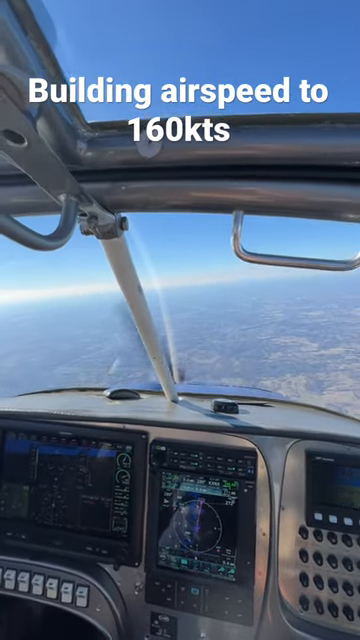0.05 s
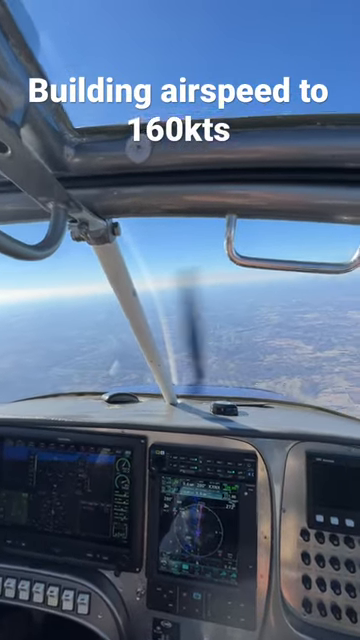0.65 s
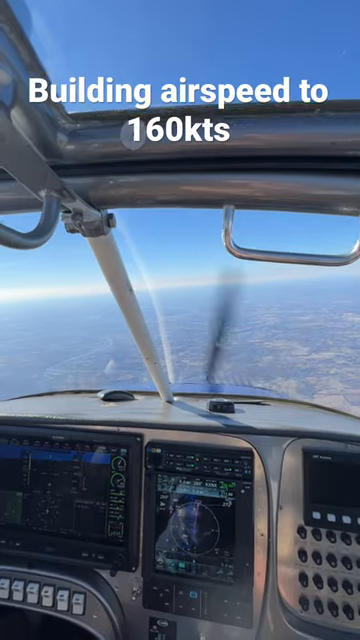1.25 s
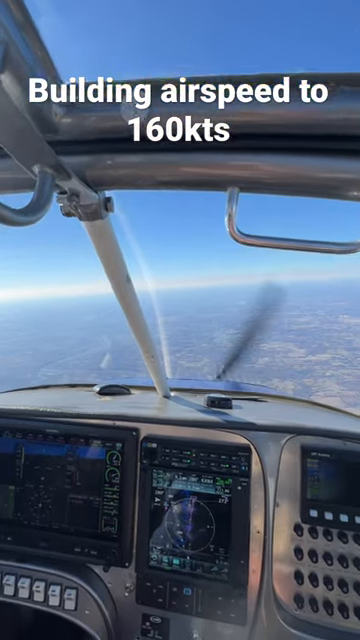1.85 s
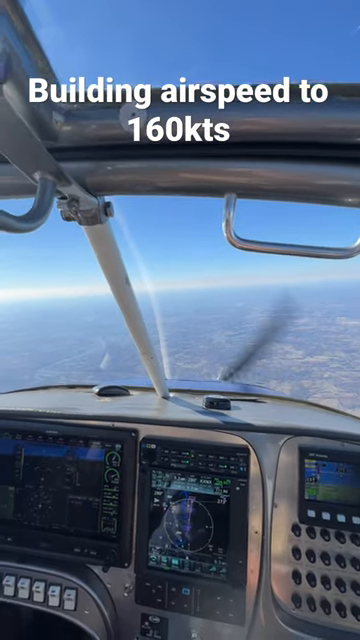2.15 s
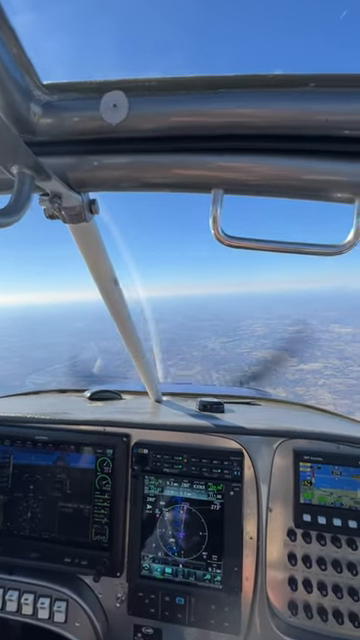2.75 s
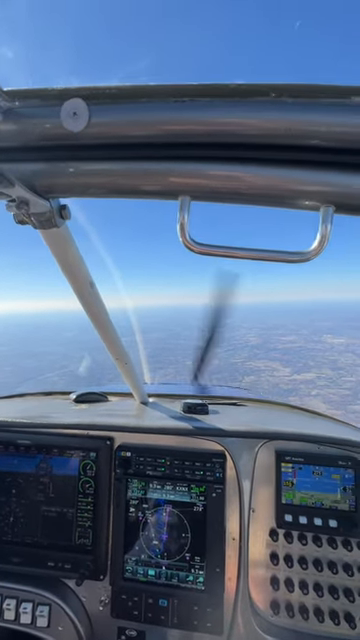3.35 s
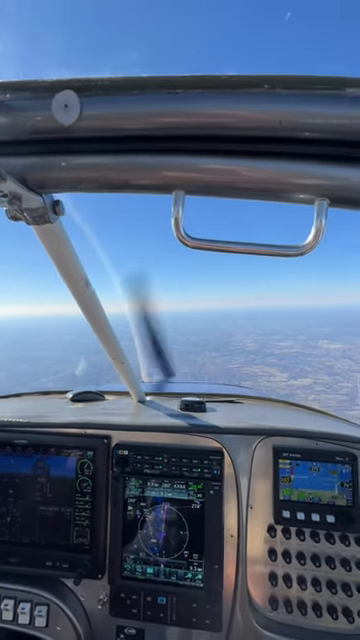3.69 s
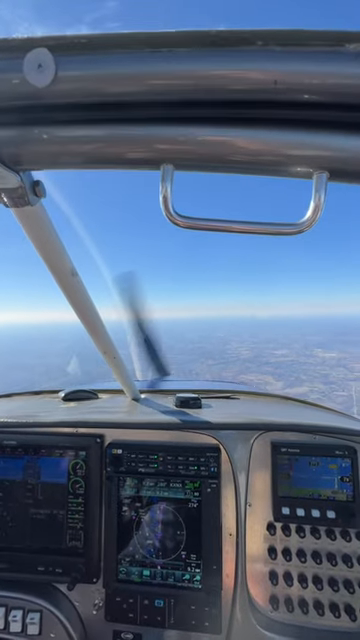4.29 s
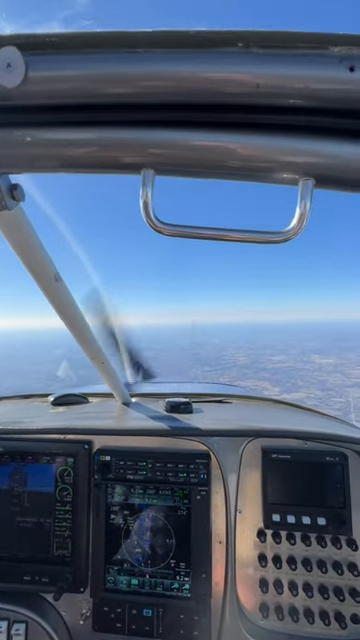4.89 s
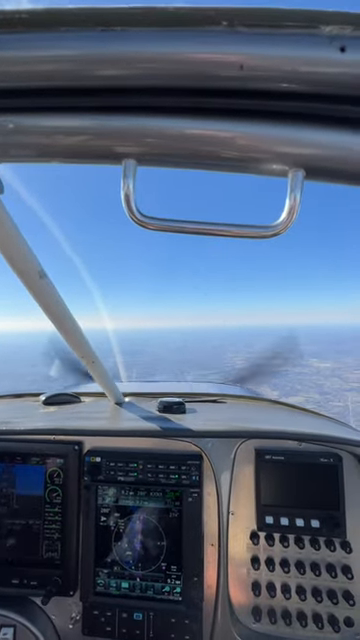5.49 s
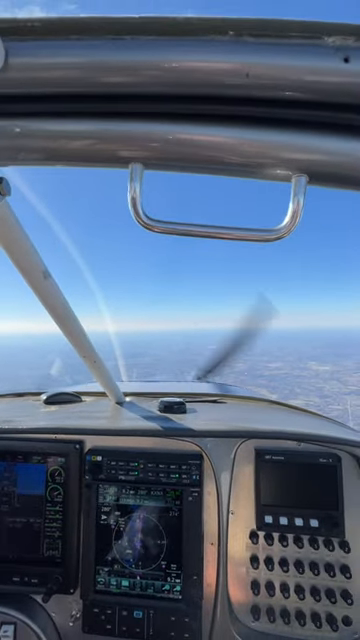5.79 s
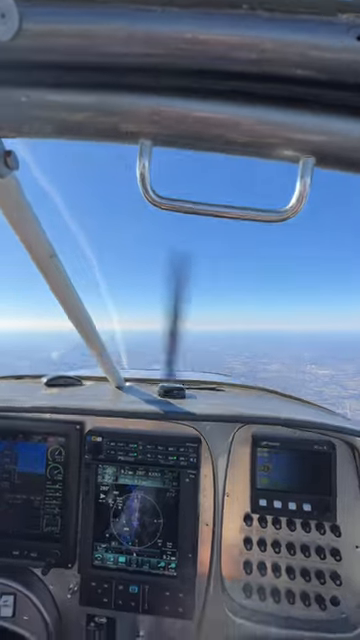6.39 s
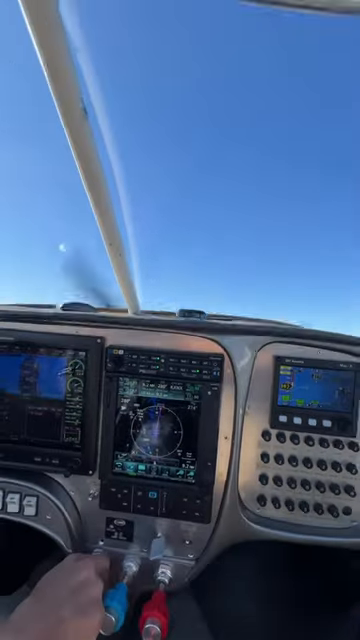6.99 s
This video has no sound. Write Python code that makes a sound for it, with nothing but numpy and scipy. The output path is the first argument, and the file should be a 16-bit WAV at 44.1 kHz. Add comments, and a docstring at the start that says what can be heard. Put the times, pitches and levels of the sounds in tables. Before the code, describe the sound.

Inside a light aircraft's cockpit, a piston engine and propeller hold a deep, throbbing drone over the roar of rushing air and a thin hiss from vents and seals. The drone is fullest and buzziest for the first two seconds or so, then softens as the hand-held microphone moves. Near the end the low boom sinks further, while the air noise carries on and the pitch barely changes.

```python
"""Inside the cockpit of a light aircraft in a shallow dive.
A four-cylinder engine and a two-blade propeller drone. Air rushing past roars through the cabin panels
and hisses at the seals and vents. Echoes in the cabin form standing waves: fixed loud and quiet spots.
We listen from a hand-held camera that moves through them, so the low notes swell and sink."""
import sys
import numpy as np
from scipy import signal
from scipy.fft import rfft, irfft, next_fast_len
from scipy.io import wavfile
from scipy.ndimage import map_coordinates

SR = 44100
rng = np.random.default_rng(int(sys.argv[2]) if len(sys.argv) > 2 else 0)


def wav_out(sig):
    """Save sig, one row per channel (or a flat mono array), as 16-bit PCM at SR to the path in sys.argv[1]."""
    wavfile.write(sys.argv[1], SR, np.round(np.clip(np.atleast_2d(sig).T, -1, 1) * 32767).astype(np.int16))


N = 310464


# The propeller's buzzing overtones. Columns: firing_multiple, level_db, gain_db_per_buzz_db
BLADE_TONES = [(4, -34.5, 1), (5, -37, 0.86), (6, -52.5, -0.5), (7, -56, 1.8), (8, -50.5, 2),
               (9, -52.5, -0.5)]
def drone(cycles, boom_db, second_db, third_db, buzz_db):
    """Four firings and four blade passes per engine cycle make a deep boom with overtones above it."""
    firings = 4 * cycles
    boom = amp(boom_db) * tone(firings, shake=0.024, shake_hz=9, lead_rad=-.06)
    second = amp(second_db) * tone(overtone(firings, 2), shake=0.011, shake_hz=12, lead_rad=-0.019)
    third = amp(third_db) * tone(overtone(firings, 3), shake=0.0077, shake_hz=11)
    buzz = 0
    for multiple, level_db, follows in BLADE_TONES:
        lead_rad = 1.02 * np.clip(multiple - 4, 0, 1.5)  # shorter waves differ more from left to right
        blade = tone(overtone(firings, round(multiple)), shake=0.098, shake_hz=9, lead_rad=lead_rad)
        buzz = buzz + amp(level_db + follows * buzz_db) * blade
    return boom * pan(-1) + second * pan(-3) + third * pan(-2.5) + buzz * pan(-0.5)


def overtone(firings, multiple, smear_turns=0.0875):
    """Turns of one overtone. The cabin's skin smears each pulse by shifting its overtones apart."""
    return multiple * firings + smear_turns * multiple * (multiple - 1)


# Tones from the unequal cylinders. Columns: cycle_multiple, level_db
CYLINDER_TONES = [(2, -44), (3, -34), (5, -27), (6, -35.5), (7, -42), (9, -35.5), (11, -42), (13, -47.5),
                  (14, -41), (15, -43), (18, -43), (19, -51), (22, -45.5), (27, -51.5), (33, -54),
                  (43, -49.5), (44, -52.5), (46, -50.5), (51, -55), (63, -52.5)]
# The next standing wave, loud where the boom is quiet.
# Columns: cycle_multiple, width_multiples, rise_db_per_sink_db
NEXT_WAVE = (6.8, .9, 2.6)
def cylinders(cycles, sink_db):
    """No two cylinders fire alike, so weaker tones fill the gaps and make the drone throb."""
    centre, width, rise = NEXT_WAVE
    tones = 0
    for multiple, level_db in CYLINDER_TONES:
        near_boom = np.exp(-((multiple - 5) / 5) ** 2)
        near_next_wave = np.exp(-((multiple - centre) / width) ** 2)
        change_db = (1.1 * near_boom - rise * near_next_wave) * sink_db
        turns = round(multiple) * cycles + rng.random()
        shake = min(0.042 + .014 * multiple, 1)
        tones = tones + amp(level_db + change_db) * tone(turns, shake, shake_hz=9)
    return tones * pan(-2)


def tone(turns, shake, shake_hz, lead_rad=0):
    """One stereo engine tone. Fuel burns unevenly, which shakes its strength and timing."""
    unevenness = 1 + shake * (wobble(shake_hz) + 1j * wobble(shake_hz))
    left = unit(unevenness) * np.exp(2j * np.pi * turns)
    right = left * np.exp(-1j * lead_rad)
    return np.sqrt(2) * np.array([left.real, right.real])


def standing_boom(distance_m, loud_db=-14.5, quiet_db=-32, wavelength_m=4.37):
    """The boom's level in dB at a distance from the quiet spot of its standing wave."""
    swing = amp(loud_db) * np.sin(2 * np.pi * distance_m / wavelength_m)
    return 20 * np.log10(np.hypot(swing, amp(quiet_db)))


# The camera's first distance from the quiet spot, and the mix there.
# Columns: distance_m, second_db, third_db, buzz_db, roar_db, vent_db, whistle_db
FIRST_SPOT = (0.68, -25.7, -20.8, 1.8, -23.5, -32, -41.5)
# Its moves. Columns: start_s, length_s, then the new spot's columns as above
CAMERA_MOVES = [(.3, 0.38, 0.76, -23.5, -20, 5, -24.5, -31.5, -42.5),
                (2.38, 0.22, 0.45, -25.2, -22.5, -7, -25.5, -32.5, -44.5),
                (2.85, .35, 0.35, -24.5, -22, -3, -24.5, -32, -42.5),
                (3.7, .5, 0.34, -25, -22.2, -2.5, -24.5, -31, -44),
                (6.36, 0.48, -.15, -29.5, -27, -4.5, -25.5, -35.5, -41.5)]
def camera(ahead_s=0):
    """The camera rests, glides to a new spot and rests again. Gives one curve per column of a spot."""
    spot = np.outer(FIRST_SPOT, np.ones(N))
    for start_s, length_s, *goal in CAMERA_MOVES:
        progress = np.clip((seconds() + ahead_s - start_s) / length_s, 0, 1)
        spot = spot + (np.array(goal)[:, None] - spot) * np.sin(np.pi / 2 * progress) ** 2
    return spot


# The roar's shape from bass to treble. Columns: pitch_hz, relative_db
ROAR_SHAPE = [(12, -32), (33, -22), (50, -17), (70, -1), (105, -1.5), (150, -12.5), (210, -8.5), (310, -11),
              (420, -12.5), (600, -17), (780, -21), (1150, -26), (1700, -27.5), (4000, -68)]
# Where the panels and cabin ring. Columns: pitch_hz, width_hz, boost_db
PANEL_RINGS = [(94, 5.2, 3.5), (121, 20, 5), (258.3, 21, 8.5), (510, 28, 1), (880, 66, 6.5), (1022, 90, 6),
               (1230, 76, 4)]
def cabin_roar(cycles, roar_db, sink_db):
    """Swirling air and exhaust shake the panels. The upper roar pulses with the engine."""
    roar = rush(ROAR_SHAPE, PANEL_RINGS)
    rumble = signal.sosfiltfilt(signal.butter(3, 105, fs=SR, output="sos"), roar)
    roar = roar + rumble * (amp(0.74 * sink_db) - 1)  # the rumble sinks with the boom
    low = signal.sosfiltfilt(signal.butter(2, 450, fs=SR, output="sos"), roar)
    throb = sum(np.cos(2 * np.pi * (multiple * cycles + rng.random())) for multiple in (2, 3, 4, 8))
    upper = (roar - low) * (1 + 0.053 * throb)
    return amp(roar_db + 0.17 * wobble(6.9)) * (low * pan(-3.5) + upper * pan(1.4))


# Air over the canopy and seals. Columns: pitch_hz, relative_db
SEAL_SHAPE = [(400, -35), (1300, -6), (1750, -6), (2400, 1.5), (2950, -0.5), (3900, -2.5), (4500, -2.5),
              (5200, -1.5), (6000, 0), (7000, -4), (8150, -6), (9000, -9), (10500, -15), (16000, -14.5)]
# The vents' hiss and its thin, sizzling top. Columns: pitch_hz, relative_db
VENT_SHAPE = [(6000, -28), (9000, -15.5), (10500, -6), (12000, -1), (13500, 3), (15000, 9), (16000, -7)]
SIZZLE_SHAPE = [(11000, -23.5), (13500, -19), (14700, -5), (15200, 6), (15750, 0), (17000, -21)]
# The sizzle dips once. Columns: middle_s, half_length_s, depth_db
BRIEF_DIP = (3.4, .33, 4)
def air_hiss(vent_db):
    """Air rushes steadily over the seals and hisses from the vents in narrow jets."""
    seals = amp(-31 + .3 * wobble(25)) * rush(SEAL_SHAPE) * pan(0.3)
    flutter_db = .3 * wobble(14)
    vent = amp(vent_db + flutter_db + 1.5) * rush(VENT_SHAPE)
    middle_s, half_length_s, depth_db = BRIEF_DIP
    dip_db = depth_db * np.exp(-((seconds() - middle_s) / half_length_s) ** 2)
    sizzle_db = -32.5 + 0.48 * (vent_db - np.mean(vent_db)) - dip_db
    sizzle = amp(sizzle_db + flutter_db + .6 * wobble(7.1)) * rush(SIZZLE_SHAPE)
    return seals + vent + sizzle


# A breathy hum across the cabin. Columns: pitch_hz, relative_db
HUM_SHAPE = [(200, -44), (335, -0.5), (385, -2.5), (620, -41)]
# The note it rings at. Columns: pitch_hz, width_hz, boost_db
HUM_RING = [(361, 13, 8.2)]
def cabin_hum(buzz_db):
    """The roar rings a standing wave across the cabin, strongest where the blades' buzz is weak."""
    return amp(-39 - 0.5 * buzz_db) * rush(HUM_SHAPE, HUM_RING) * pan(-7.5)


# The noise of a leak. Columns: pitch_hz, relative_db
LEAK_SHAPE = [(1500, -40), (2400, -0.5), (2900, -1.5), (4200, -40)]
# Its breathy whistles. Columns: pitch_hz, width_hz, boost_db
LEAK_WHISTLES = [(2530, 190, 18.5), (2840, 230, 21.5)]
def seal_whistle(whistle_db):
    """A leaking seal whistles faintly, louder when the camera is near it."""
    return amp(whistle_db + 1.4 * wobble(7.5)) * rush(LEAK_SHAPE, LEAK_WHISTLES)


# The hiss at the edge of the canopy, the cockpit's clear roof. Columns: pitch_hz, relative_db
EDGE_SHAPE = [(3000, -35), (4300, -2), (4800, 1), (5800, -35)]
def edge_hiss(start_db=-54, growth_db_per_s=1.3):
    """Air hisses past the canopy's edge, louder as the dive gathers speed."""
    return amp(start_db + growth_db_per_s * seconds() + .8 * wobble(4)) * rush(EDGE_SHAPE)


def glass_echoes(sound, depth_db=0.9, width_hz=450, length_s=0.716):
    """Echoes off the glass add and cancel as the camera moves, making slowly shifting peaks and dips."""
    hz, t, spectrum = signal.stft(sound, SR, nperseg=1024)
    grid = np.meshgrid(hz / width_hz, t / length_s, indexing="ij")
    ripple = map_coordinates(rng.standard_normal((128, 64)), grid, mode="wrap")
    return signal.istft(spectrum * amp(depth_db * ripple), SR, nperseg=1024)[1][:, :N]


# How air noise reaches the two microphones. Columns: pitch_hz, likeness_0_to_1, left_lead_rad
STEREO_LIKENESS = [(30, .97, 0), (120, .99, 0), (290, .94, 0), (450, .7, .5), (580, .25, 0),
                   (880, .82, .15), (1200, .7, .75), (1450, .5, .3), (1780, .82, 0), (2100, .15, 1.5),
                   (2450, .7, 2.6), (3000, .55, 2.4), (3950, .2, 0), (5100, .38, 3.1), (7000, .1, 1.5),
                   (7650, .8, 0), (8250, .93, 0), (8700, .45, -.9), (10000, .45, -1.4), (12200, .56, -1.45),
                   (15200, .81, -1.6)]
def rush(shape, rings=()):
    """Stereo air noise of strength 1, with a bass-to-treble shape and any ringing peaks."""
    hz = np.fft.rfftfreq(N, 1 / SR)
    shape_hz, shape_db = np.transpose(shape)
    colour_db = np.interp(np.log(hz + 1), np.log(shape_hz + 1), shape_db)
    colour_db += sum(db / (1 + (2 * (hz - centre) / width) ** 2) for centre, width, db in rings)
    pitch_hz, likeness, lead_rad = np.transpose(STEREO_LIKENESS)
    shared = np.interp(hz, pitch_hz, np.clip(likeness, 0, 1) * np.exp(-1j * lead_rad))
    left, separate = rfft(rng.standard_normal((2, N)))
    right = shared * left + np.sqrt(np.abs(1 - np.abs(shared) ** 2)) * separate
    return unit(irfft(np.array([left, right]) * amp(colour_db), N))


def wobble(rate_hz):
    """A smooth curve through rate_hz random values a second."""
    steps = np.arange(0, N, 64)
    curve = map_coordinates(rng.standard_normal(1024), [steps * rate_hz / SR], mode="wrap")
    return np.interp(np.arange(N), steps, curve)


def pan(left_db):
    """Two gains that make the left side left_db louder than the right."""
    return amp([[left_db / 2], [-left_db / 2]])


def amp(db):
    """Turn decibels into a gain."""
    return 10 ** (np.asarray(db) / 20)


def unit(x):
    """Scale to an average strength (rms) of 1."""
    return x / np.sqrt(np.mean(np.abs(x) ** 2) + 1e-20)


def seconds():
    """The time of each sample."""
    return np.arange(N) / SR


def scene():
    """The engine's speed sets the pitch of the drone, and the camera's spot sets the mix."""
    t = seconds()
    rpm = 2412.2 - 2.6 * t - .34 * t ** 2  # the engine slows a little
    cycles = np.cumsum(rpm / 60 / 2) / SR  # two turns of the shaft make one engine cycle
    distance_m, second_db, third_db, _, roar_db, vent_db, whistle_db = camera()
    _, _, _, buzz_db, *_ = camera(ahead_s=0.051)  # the buzz's short waves change before the long ones
    boom_db = standing_boom(distance_m)
    sink_db = np.minimum(boom_db + 23, 0)  # near the quiet spot, nearby pitches sink with the boom
    engine = drone(cycles, boom_db, second_db, third_db, buzz_db) + cylinders(cycles, sink_db)
    fade_db_per_s = 1  # the vents fade as the camera turns away
    air = glass_echoes(air_hiss(vent_db - fade_db_per_s * t) + seal_whistle(whistle_db) + edge_hiss())
    return engine + cabin_roar(cycles, roar_db, sink_db) + cabin_hum(buzz_db) + air


def record(dry):
    """The camera picks up nothing above its highest pitch."""
    top_hz = 15760
    size = next_fast_len(N + SR // 2)
    heard = np.fft.rfftfreq(size, 1 / SR) < top_hz
    return irfft(rfft(dry, size) * heard, size)[:, :N]


dry = scene()
out = record(dry)
wav_out(out)
```